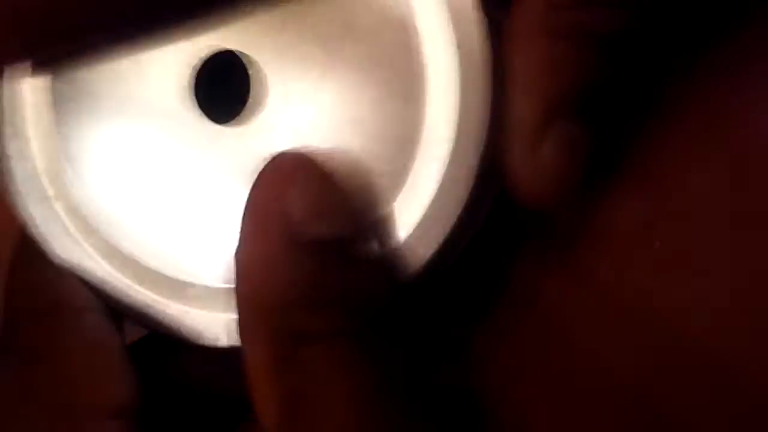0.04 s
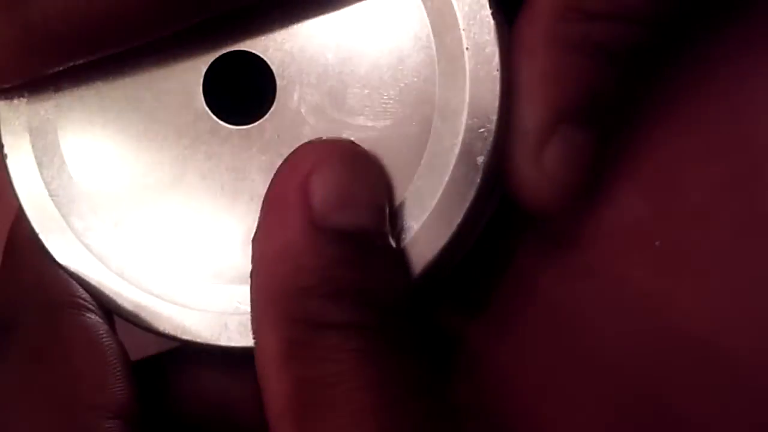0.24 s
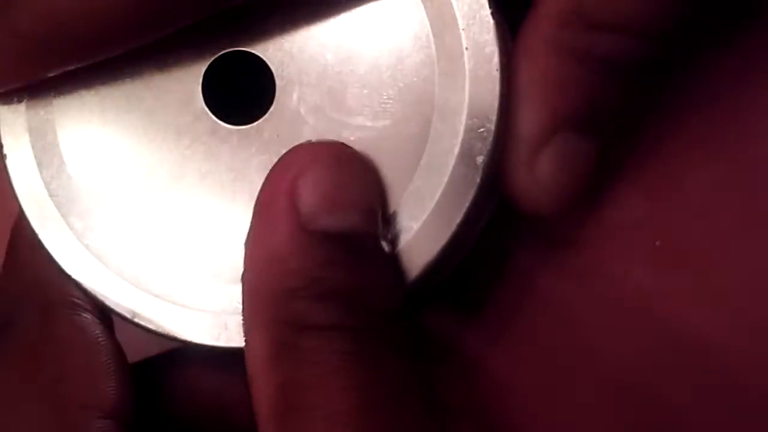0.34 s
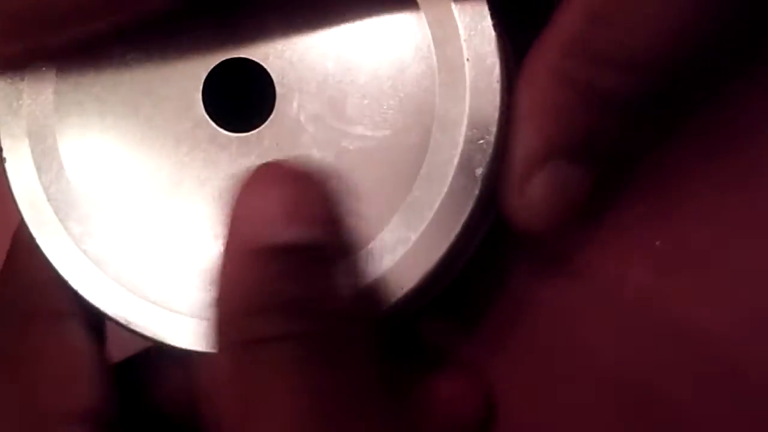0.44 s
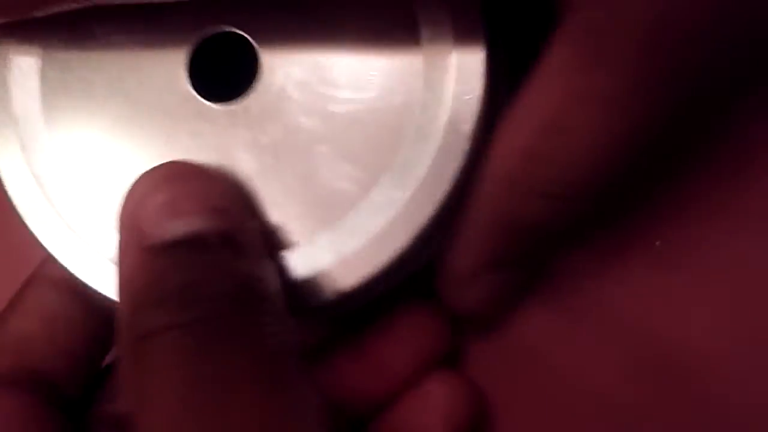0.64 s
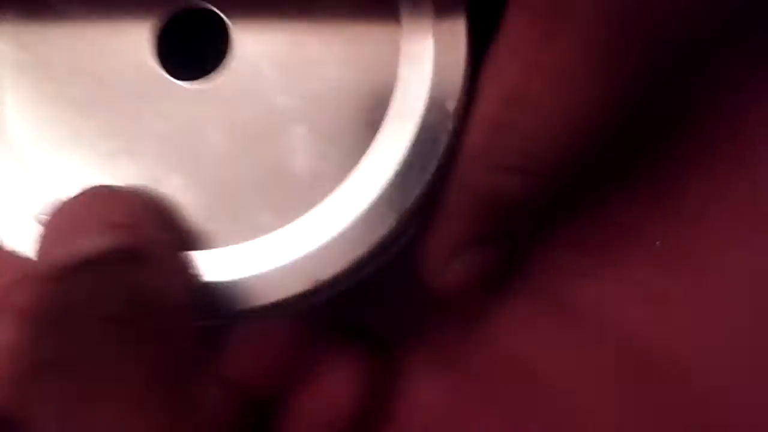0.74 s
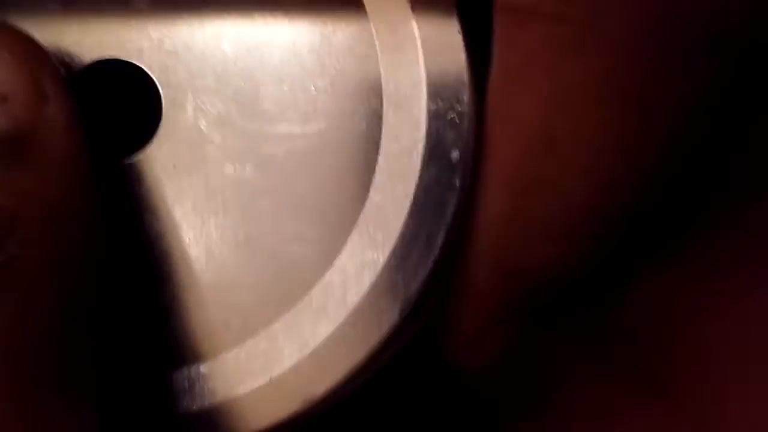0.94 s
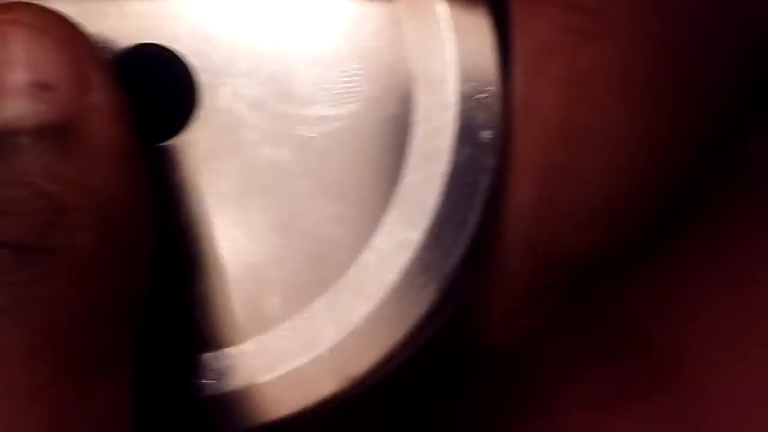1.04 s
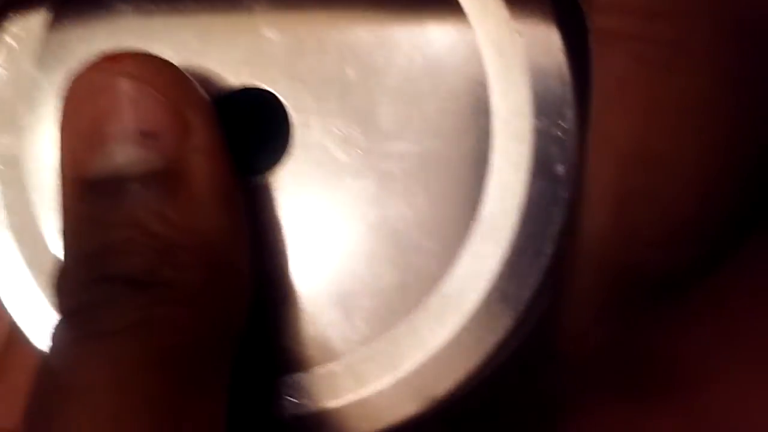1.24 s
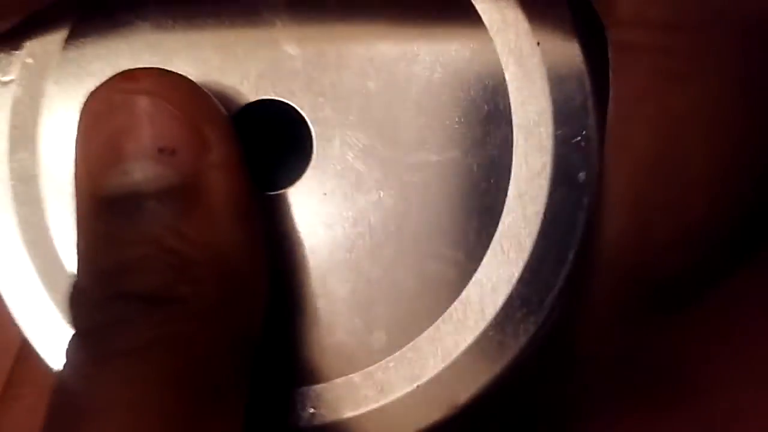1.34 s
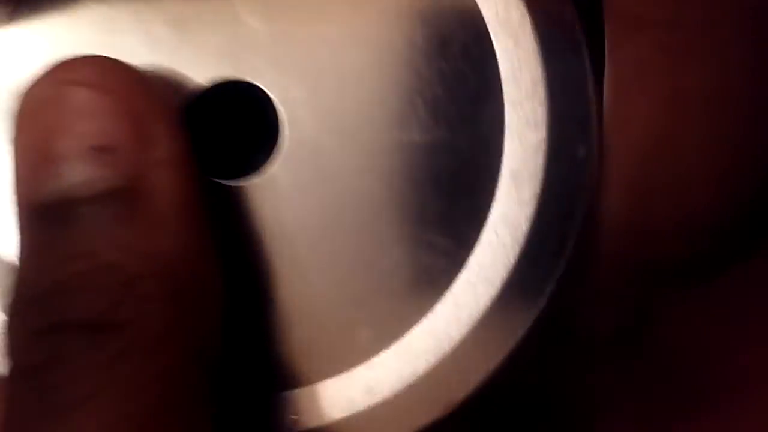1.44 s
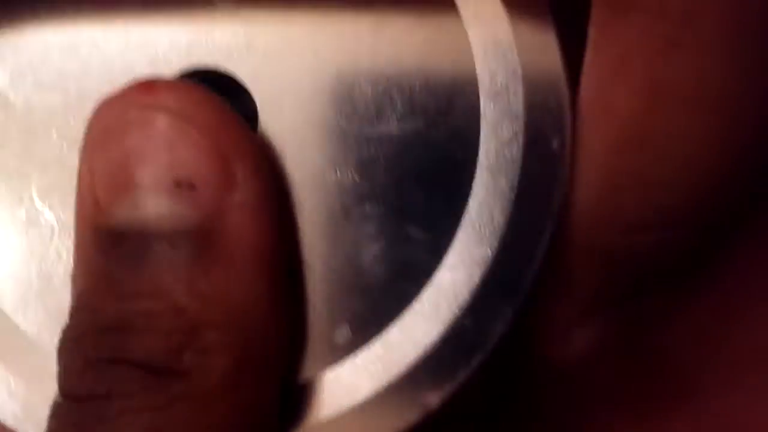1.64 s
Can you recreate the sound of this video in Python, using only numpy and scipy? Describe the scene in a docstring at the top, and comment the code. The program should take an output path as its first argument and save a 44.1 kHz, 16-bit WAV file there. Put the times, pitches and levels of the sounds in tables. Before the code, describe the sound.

A thin metal lid clacks sharply with a brief rattle. Fingers rub and nudge it faintly, then a few light ticks lead to a smaller snap. It is heard close up in a small, quiet, hard-walled room.

```python
"""A thin metal lid, handled close up in a small, quiet, hard-walled room.
It clacks down once and rattles, fingers rub and nudge it, then a few light ticks lead to a smaller snap.
Each blow is a thump, a crack and a short ring; each rub is skin slipping over the metal in tiny jerks.
The hand damps the metal, so the room carries the tails; a noise gate pulls the hiss down in the pauses."""
import sys
import numpy as np
from scipy import signal
from scipy.fft import rfft, irfft
from scipy.io import wavfile
from scipy.ndimage import uniform_filter1d, minimum_filter1d

SR = 44100
rng = np.random.default_rng(int(sys.argv[2]) if len(sys.argv) > 2 else 0)


def store_pcm(level_fs):
    """Save levels as 16-bit WAV."""
    pcm = np.round(np.clip(level_fs, -1, 1) * 32767).astype(np.int16)
    wavfile.write(sys.argv[1], SR, np.atleast_2d(pcm).T)


N = 74970

# Room tone. Each row: frequency in Hz, relative level in dB.
ROOM_TONE_EQ = [(25, -21.5), (60, -12.5), (93, -4.5), (105, 0), (120, 9), (140, -5), (170, -7.5),
                (400, -11), (1000, -20), (3000, -25.5), (7000, -28.5), (15000, -35)]
# Finger strokes. Each row: start and length in seconds, pitch of the pressed lid in Hz,
# then groan, scrape and hiss levels in dB.
FINGER_RUBS = [(-.05, .15, 399, -58.5, -69, -80.5), (0.112, 0.035, 387, -54.5, -74, -87.5),
               (0.154, 0.13, 480, -62.5, -66, -80), (0.64, 0.084, 381.6, -66.5, -67, -84),
               (0.748, 0.12, 288.7, -54.5, -65, -81.5), (0.808, 0.13, 343.8, -59.5, -66.5, -75.5),
               (0.891, 0.078, 350.7, -70.5, -74, -69), (1.085, .1, 400, -84, -65.5, -84),
               (1.198, 0.071, 423, -62, -52, -80), (1.544, 0.061, 113, -72, -72.5, -91)]
# The midrange scrape of skin. Each row: frequency in Hz, relative level in dB.
SCRAPE_EQ = [(100, -22.5), (300, -2), (520, 3), (760, 2), (950, -9.5), (1400, -2), (1850, -8.5),
             (2050, -16), (2700, -19), (3200, -31.5), (5000, -32.5)]
# The airy top of a rub. Each row: frequency in Hz, relative level in dB.
HISS_EQ = [(1000, -25), (3500, -23), (5000, -6.5), (5900, -0.5), (7400, 0), (9500, -8), (15000, -19.5)]
# Hits on the lid. Each row: start in seconds, thump pitch in Hz, thump level in dB, gains in dB for
# the metal's body, its bright click and its top (relative to the click), longest smear in seconds.
LID_BLOWS = [(.052, 480, -39.5, -88, -85, 0, 0.00099), (.203, 274, -30, -66, -85, -18, 0.0008),
             (.2185, 288, -12.5, -6, -13, -4.5, 0.0039), (.2208, 512, -6.5, -14, -14, -7.5, 0.0039),
             (.256, 278, -35, -15, -24, 3, 0.0033), (.2628, 650, -21, -15, -19.5, -10, 0.0076),
             (0.2665, 267, -14.5, -13.5, -13.5, -11, 0.0064), (0.2811, 290, -25, -16, -19.5, -3, .006),
             (0.2865, 660, -34, -19, -25.5, -9, .006), (0.9059, 753, -43.5, -40.5, -58, 6, 0.0095),
             (.916, 500, -47, -44.5, -77, 3, 0.0045), (1.094, 400, -74, -66, -70, 3, 0.0072),
             (1.180, 1200, -42.5, -52, -76, -1, 0.0032), (1.196, 480, -44.5, -40, -46, -4, 0.00542),
             (1.2525, 792, -49.5, -44.5, -52, 6, 0.0037), (1.2745, 340, -25.5, -39, -35, 4, 0.0029),
             (1.277, 431, -20.5, -28.5, -27.5, 2.5, 0.0045), (1.654, 1000, -59.5, -63, -68, 6, 0.0032),
             (1.669, 748, -39.5, -45, -49, 8, 0.00284)]
# Modes of the hand-held lid. Each row: frequency in Hz, relative level in dB, seconds to fall 60 dB.
LID_MODES = [(480, -10, 0.033), (590, -5.5, .03), (669, -11.5, .06), (1068, -7, .035), (1221, -6, 0.037),
             (1366, -6.5, 0.023), (1704, -11.5, .03), (2378, -11, .02), (2773, -13, 0.024),
             (3780, -17, .015), (4517, -14.5, 0.021), (5740, -14, 0.027), (6335, -10, .012),
             (7336, -15.5, 0.015), (8300, -25.5, .015)]
# Contact noise, shaped by the lid's broad resonances. Each row: frequency in Hz, relative level in dB.
CRACK_EQ = [(30, -24.5), (60, -22), (105, 1.5), (165, -18), (270, 1.5), (355, -6), (440, 2.5), (660, 3.5),
            (840, -8.5), (1030, 5), (1450, 2.5), (1800, 0), (2050, -7.5), (2380, -1.5), (2850, -3),
            (3130, -10), (3750, -4), (4500, -0.5), (5050, -8), (5700, 0.5), (6400, -1), (7400, -2.5),
            (8300, -8), (10500, -18.5), (15500, -30)]
# The room's decay. Each row: frequency in Hz, seconds to fall 60 dB.
REVERB_T60 = [(100, 0.08), (300, 0.63), (650, 0.58), (1400, 0.6251), (2500, 0.4776), (4600, 0.4654),
              (7500, 0.3519), (12000, 0.44)]
# The room's colour. Each row: frequency in Hz, relative level in dB.
REVERB_EQ = [(50, -7), (100, 3.5), (170, -7), (280, 1), (370, 0), (440, -2.5), (580, -2.5), (665, -0.5),
             (830, -3), (1000, -1.5), (1200, -2.5), (1500, 0), (1800, 1.5), (2100, 1), (2500, 2), (3150, 4),
             (4500, 6.5), (5200, 6), (7000, 5), (13000, 0)]


def amp(db):
    """Decibels to gain."""
    return 10 ** (np.asarray(db) / 20)


def unit(x):
    """Scales to rms 1."""
    return x / np.sqrt(np.mean(x ** 2) + 1e-20)


def curve_at(points, hz):
    """Reads a curve on a log-frequency axis."""
    freqs, values = np.transpose(points)
    return np.interp(np.log(hz + 1), np.log(freqs + 1), values)


def add(mix, start_s, sound):
    """Drops a sound into the mix, trimming any overhang."""
    at = round(start_s * SR)
    sound = sound[max(-at, 0):]
    part = mix[max(at, 0):][:len(sound)]
    part += sound[:len(part)]


def equalise(x, eq, size=4096):
    """Colours a sound with a causal filter of unit energy."""
    log_gain = np.log(amp(curve_at(eq, abs(np.fft.fftfreq(size, 1 / SR)))))
    minimum_phase = np.exp(np.conj(signal.hilbert(log_gain)))
    taps = np.fft.ifft(minimum_phase).real[:size // 2]
    return signal.fftconvolve(x, taps / np.linalg.norm(taps))[:len(x)]


def room_tone(level_db=-67):
    """A faint bed of noise with a low hum in it."""
    return amp(level_db) * unit(equalise(rng.standard_normal(N), ROOM_TONE_EQ))


def finger_rub(length_s, pitch_hz, groan_db, scrape_db, hiss_db, slips_per_s=600, groan_width_hz=62):
    """Skin slips over the metal in tiny jerks, which make the lid groan, scrape and hiss."""
    t = np.arange(SR // 4) / SR
    slips = rng.standard_normal(len(t)) * (rng.random(len(t)) < slips_per_s / SR)
    resonance = t * np.exp(-np.pi * groan_width_hz * t) * np.sin(2 * np.pi * pitch_hz * t)
    groan = unit(signal.fftconvolve(slips, resonance)[:len(t)])
    scrape = unit(equalise(slips, SCRAPE_EQ))
    hiss = unit(equalise(rng.standard_normal(len(t)), HISS_EQ))
    stroke = np.sqrt(abs(np.sin(np.pi * np.minimum(t / length_s, 1))))
    return stroke * (amp(groan_db) * groan + amp(scrape_db) * scrape + amp(hiss_db) * hiss)


def lid_blow(thump_hz, thump_db, body_db, click_db, top_db, smear_s, thump_t60_s=0.039):
    """One contact: a hollow thump, plus a crack and the metal's damped ring, smeared as the rim scuffs."""
    t = np.arange(SR // 5) / SR
    freqs = np.fft.rfftfreq(len(t), 1 / SR)
    mode_hz, mode_db, t60_s = np.transpose(LID_MODES)[:, :, None]
    modes = amp(mode_db - 60 * t / t60_s) * np.cos(2 * np.pi * mode_hz * t)
    ring = modes.sum(0) * (1 - np.exp(-t / 0.00081))  # attack under a millisecond
    crack = equalise(1. * (t == 0), CRACK_EQ)
    strike = amp(-3.5) * ring + amp(19) * crack
    # The scuff gives each band its own random delay.
    band_lags = smear_s * rng.random(90)
    lag_s = np.interp(freqs, np.linspace(0, SR / 2, len(band_lags)), band_lags)
    scuff = np.exp(-2j * np.pi * np.cumsum(lag_s) * freqs[1])
    tilt_eq = [(1400, body_db), (3400, click_db), (6200, click_db), (16000, click_db + top_db)]
    metal = irfft(rfft(strike) * scuff * amp(curve_at(tilt_eq, freqs)), len(t))
    thump_envelope = amp(thump_db - 60 * t / thump_t60_s) * (1 - np.exp(-t / 0.0008))
    thump = thump_envelope * np.sin(2 * np.pi * thump_hz * t)
    return thump + metal * (t < t[-1] / 2)


def room_reverb(x, wet_db=-3.5, predelay_s=0.0044):
    """Dense reflections off hard walls, each band dying at its own speed."""
    reflections = rng.choice([-1., 1.], SR) * (rng.random(SR) < .15)
    hz, t, bands = signal.stft(reflections, SR, nperseg=256)
    decay = amp(-60 * t / curve_at(REVERB_T60, hz)[:, None])
    tail = signal.istft(bands * decay, SR, nperseg=256)[1]
    tail *= np.clip(np.arange(len(tail)) / SR / predelay_s - 1, 0, 1)  # a gap, then a quick fade-in
    response = equalise(tail / np.linalg.norm(tail), REVERB_EQ)
    return amp(wet_db) * signal.fftconvolve(x, response)[:N]


def scene():
    """Blows and rubs on the lid, with reverb and room tone, in mono."""
    lid = np.zeros(N)
    for start_s, *blow in LID_BLOWS:
        add(lid, start_s, lid_blow(*blow))
    for start_s, *rub in FINGER_RUBS:
        add(lid, start_s, finger_rub(*rub))
    return (lid + room_tone() + room_reverb(lid))[None]


def record(dry):
    """The microphone's bass roll-off, a soft noise gate that ducks the quietest moments, and a high cut."""
    low_cut_hz, high_cut_hz = 75.6, 16000
    threshold_db, depth_db, slope, window_s, hold_s = -61, 14, 3.45, 0.023, 0.012
    sound = signal.sosfilt(signal.butter(2, low_cut_hz, "high", fs=SR, output="sos"), dry)
    power = uniform_filter1d(sound[0] ** 2, int(window_s * SR))
    level_db = 10 * np.log10(abs(power) + 1e-14)
    duck_db = np.clip(slope * (threshold_db - level_db), 0, depth_db)
    half_hold = int(hold_s * SR / 2)
    held_db = minimum_filter1d(duck_db, 2 * half_hold + 1, origin=half_hold)
    gated = sound * amp(-uniform_filter1d(held_db, size=600))  # eases open and shut
    high_cut = signal.firwin(511, high_cut_hz, window=("kaiser", 9), fs=SR)
    return signal.oaconvolve(gated, high_cut[None], "same")


dry = scene()
out = record(dry)
store_pcm(out)
```